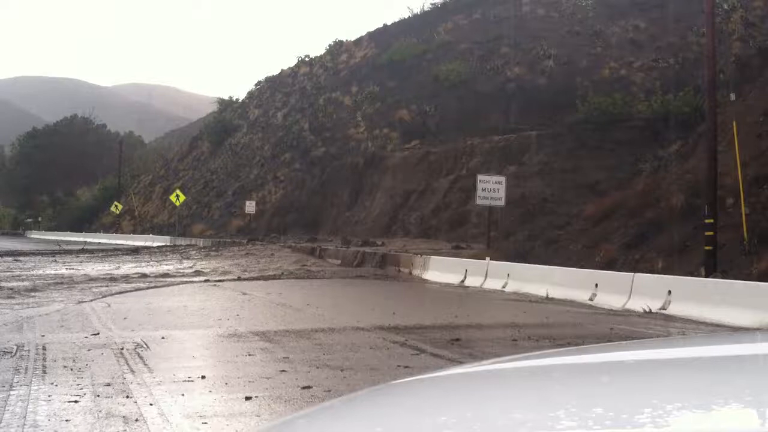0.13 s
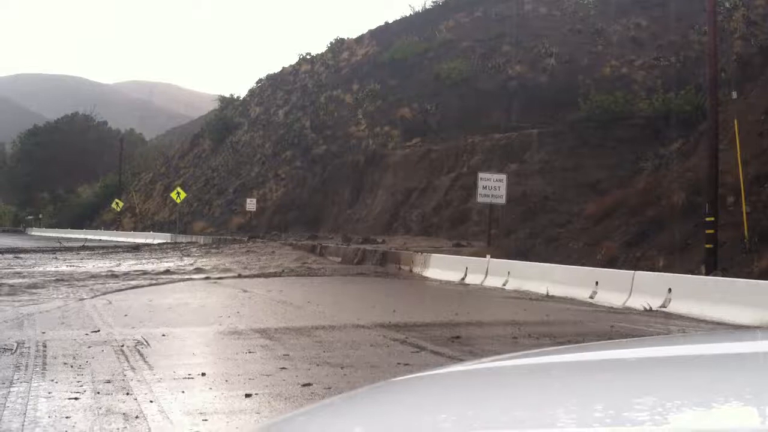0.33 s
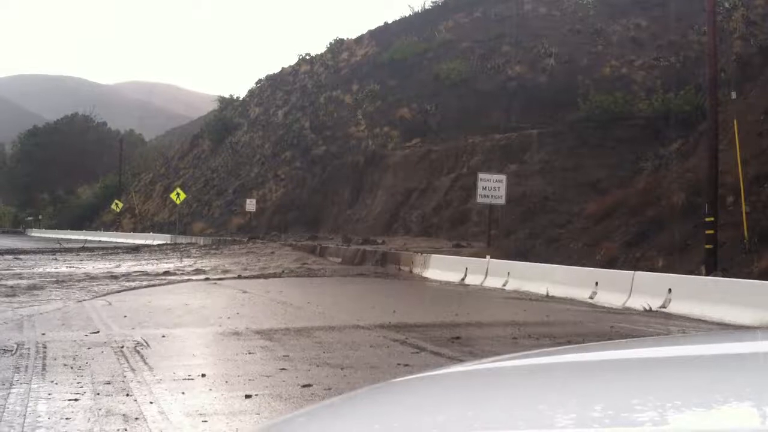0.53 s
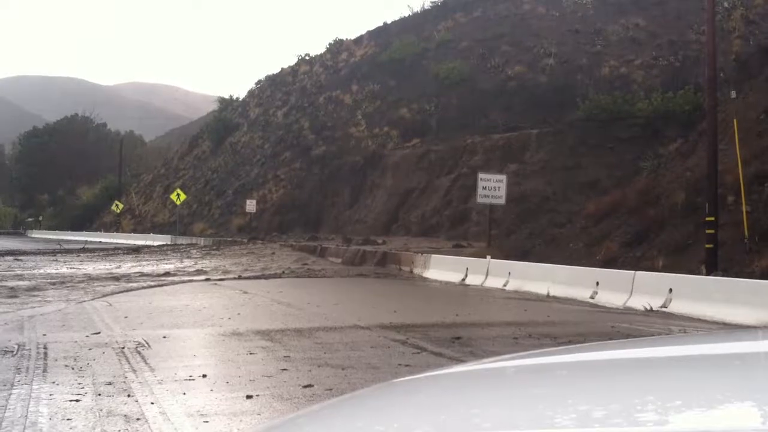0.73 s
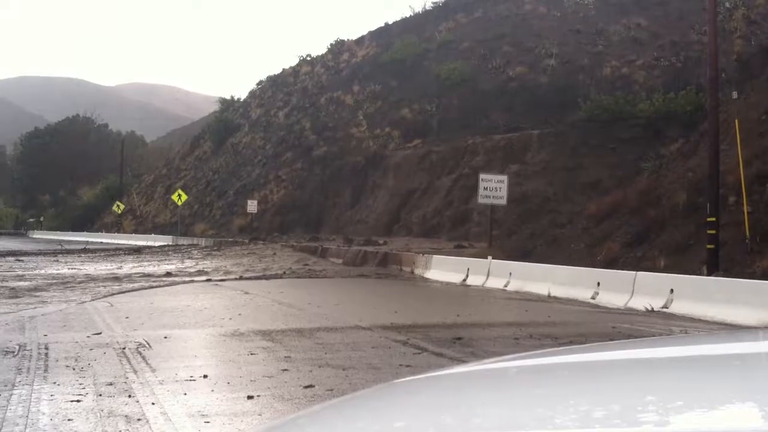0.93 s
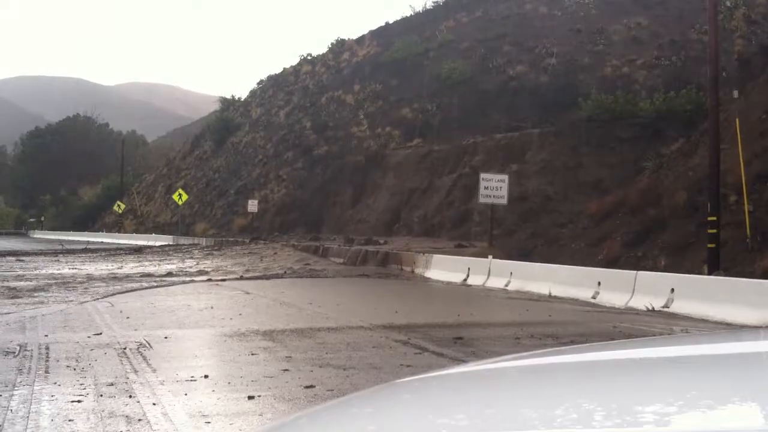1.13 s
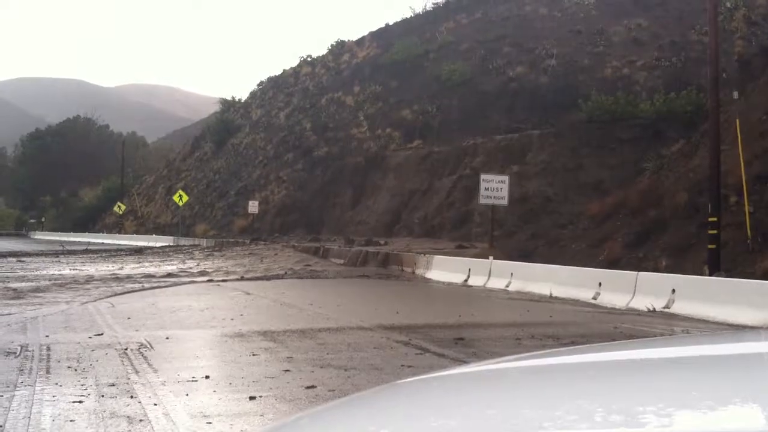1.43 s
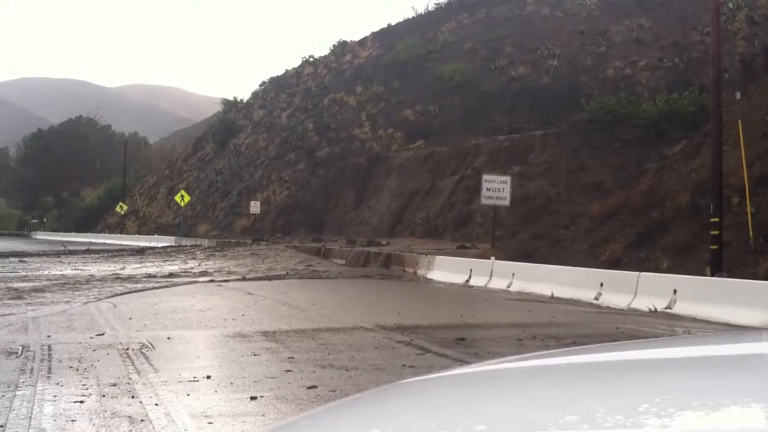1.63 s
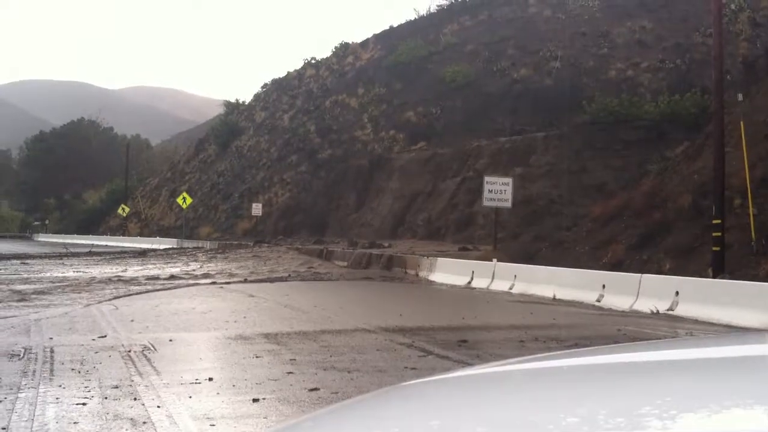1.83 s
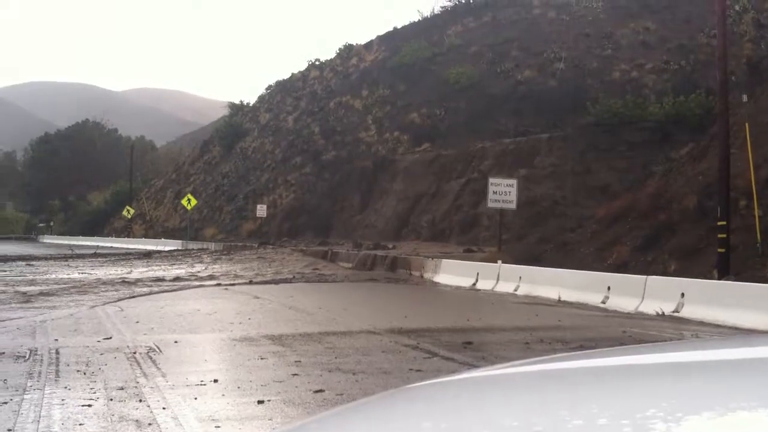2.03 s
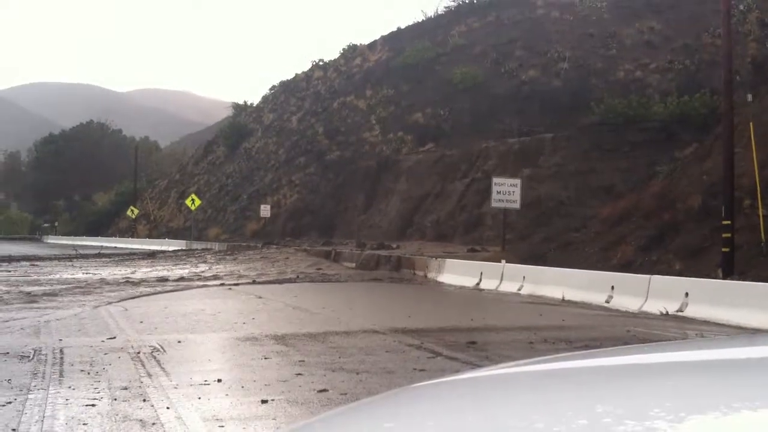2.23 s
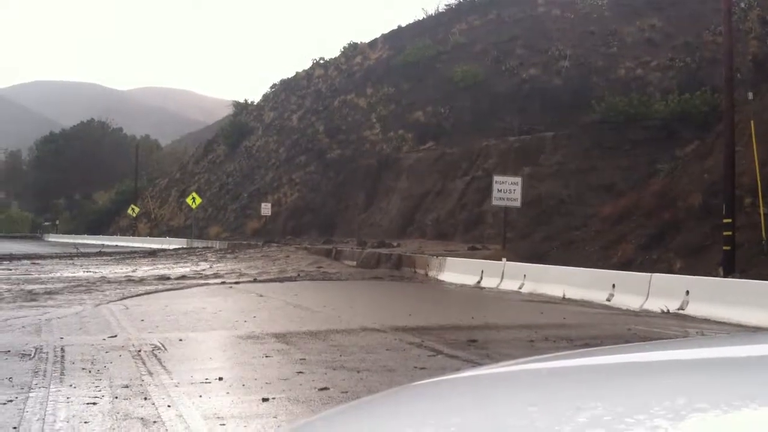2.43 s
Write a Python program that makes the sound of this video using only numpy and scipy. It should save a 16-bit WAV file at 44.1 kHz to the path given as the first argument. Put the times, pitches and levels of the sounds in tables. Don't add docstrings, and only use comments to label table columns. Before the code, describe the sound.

Muddy water rushes steadily across a road, heard from a standing car. The sound starts abruptly, a smooth bubbly hiss over a low roar, with hollow booming tones, sparse light ticks and slight wind late.

```python
import sys
import numpy as np
from scipy import signal
from scipy.fft import rfft, irfft
from scipy.io import wavfile

SR = 44100
rng = np.random.default_rng(int(sys.argv[2]) if len(sys.argv) > 2 else 0)


def amplitude_ratio(level_db):
    exponent = np.asarray(level_db, float) / 20
    return 10 ** exponent


def wrap_up_sound(samples):
    columns = np.atleast_2d(samples).T
    tamed = np.clip(columns, -1, 1)
    steps = np.round(tamed * 32767).astype(np.int16)
    wavfile.write(sys.argv[1], SR, steps)


N = 113337


def rms_one(x):
    return x / np.sqrt(np.mean(x ** 2) + 1e-20)


def follow(points):
    seconds, db = np.transpose(points)
    return amplitude_ratio(np.interp(np.arange(N) / SR, seconds, db))


def drift(rate):
    step = 40
    r = np.exp(-2 * np.pi * rate * step / SR)
    noise = rng.standard_normal(N // step + 2002)
    slow = signal.lfilter([1], [1, -2 * r, r * r], noise)[2000:]
    return np.interp(np.arange(N) / step, np.arange(len(slow)), rms_one(slow - slow.mean()))


def resonate(x, hz, width_hz):
    r = np.exp(-np.pi * width_hz / SR)
    zeros = np.array([1, 0, -1]) * (1 - r * r) / 2
    poles = [1, -2 * r * np.cos(2 * np.pi * hz / SR), r * r]
    return signal.lfilter(zeros, poles, x + 1e-18)


def coloured(x, points, patchy_db):
    hz = np.arange(N // 2 + 1) * SR / N + 1
    at, db = np.transpose(points)
    skirt = 40 * (np.minimum(np.log2(hz / at[0]), 0) - np.maximum(np.log2(hz / at[-1]), 0))
    whole = rfft(x) * amplitude_ratio(np.interp(np.log(hz), np.log(at), db) + skirt)
    bands = np.arange(int(3 * np.log2(at[0])), int(3 * np.log2(at[-1])) + 2)
    place = np.clip(3 * np.log2(hz), bands[0], bands[-1])
    out, together = np.zeros(N), drift(2.9)
    for k in bands:
        band = irfft(whole * np.maximum(1 - np.abs(place - k), 0), N)
        out += band * amplitude_ratio(patchy_db * (0.59 * together + drift(12.0)))
    return rms_one(out)


def bubbles():
    bubbles_per_s, spread_db, ring_cycles, share = 8200, 1.5, 3.7, 0.26
    sizes = amplitude_ratio(spread_db * np.minimum(rng.exponential(1, N), 5)) * rng.choice([-1, 1], N)
    bursts = sizes * (rng.random(N) < bubbles_per_s / SR)
    pitches = np.geomspace(400, 12000, 24)
    dealt = rng.integers(0, len(pitches), N)
    fizz = np.zeros(N)
    for k, hz in enumerate(pitches):
        fizz += resonate(bursts * (dealt == k), hz, 2.3 * hz / ring_cycles)
    return share * rms_one(fizz) + np.sqrt(1 - share ** 2) * rng.standard_normal(N)


# time in seconds, level in dB.
FLOW = [(0.1, -32), (0.7, -32), (1.3, -32), (1.9, -32), (2.57, -32)]
# frequency in Hz, density in dB per Hz.
RUSH = [(450, -6), (800, -5), (1300, -6.5), (2000, -5), (2600, 0), (3500, -8), (5200, -15.5), (6200, -29.5)]
# frequency in Hz, density in dB per Hz.
SPRAY = [(5000, -1.5), (6500, -5), (8600, -1.5), (10000, -9), (11500, -20), (12300, -31), (14600, -30)]


def rush():
    spray_db, spray_swell_db = -18.5, 0.5
    foam = bubbles()
    spray_gain = amplitude_ratio(spray_db + spray_swell_db * np.linspace(-0.5, 0.5, N))
    spray = spray_gain * coloured(foam, SPRAY, patchy_db=0.5)
    return follow(FLOW) * (coloured(foam, RUSH, patchy_db=0.08) + spray)


def off_the_car(x):
    delay_s, share, cut_hz = 0.001292, 0.22, 4200
    dull = signal.sosfilt(signal.butter(1, cut_hz, fs=SR, output="sos"), x)
    bounce = np.interp(np.arange(N) - delay_s * SR, np.arange(N), dull)
    return (x + share * bounce) / np.sqrt(1 + share ** 2)


# frequency in Hz, density in dB per Hz.
ROAR = [(70, -23.5), (100, -23), (130, -10), (170, -3.5), (240, -4.5), (310, -3.5), (400, -10),
        (500, -16.5)]


def mud_roar():
    level_db, swell_db, dip_share, dip_width_hz = -39.5, 3, 0.56, 30
    gain = amplitude_ratio(level_db + swell_db * np.linspace(-0.5, 0.5, N))
    roar = gain * coloured(rng.standard_normal(N), ROAR, patchy_db=0.44)
    near_tones = sum(resonate(roar, hz, dip_width_hz) for hz, _, _ in DRONE)
    return roar - dip_share * near_tones


# frequency in Hz, width in Hz, level in dB.
DRONE = [
    (180, 13, -52.5),
    (284.5, 15.5, -51.5),
    (314.8, 9.2, -51),
]
# centre in seconds, frequency in Hz, length in seconds,
# peak in dB.
BOOMS = [(0.252, 322, 0.23, -45.5), (0.306, 180, 0.11, -50.5), (0.542, 182.2, 0.12, -37.5),
         (0.6, 320.6, 0.2, -41.5), (0.72, 174, 0.16, -45.5), (0.825, 317.4, 0.096, -40),
         (0.835, 287, 0.14, -39.5), (0.835, 176.6, 0.26, -46), (1.087, 180, 0.19, -36.5),
         (1.222, 328, 0.12, -39.5), (1.302, 180.3, 0.15, -40), (1.49, 179.3, 0.12, -42),
         (1.545, 319, 0.11, -44), (1.69, 180, 0.23, -42), (2.04, 170.7, 0.13, -41.5),
         (2.408, 307, 0.19, -41)]


def drone():
    out, t = np.zeros(N), np.arange(N) / SR
    for hz, width_hz, db in DRONE:
        noise = rng.standard_normal(N + SR)
        tone = resonate(resonate(noise, hz, width_hz), hz, width_hz)
        out += amplitude_ratio(db) * rms_one(tone[SR:])
    for centre_s, hz, length_s, db in BOOMS:
        swell = np.cos(np.pi * np.clip((t - centre_s) / length_s, -0.5, 0.5)) ** 2
        out += amplitude_ratio(db) * swell * np.sin(2 * np.pi * (hz * t + rng.random()))
    return out


# time in seconds, level change in dB.
SURGE = [
    (0.1, -0.5),
    (0.4, 0),
    (0.58, 0),
    (0.85, 0.5),
    (1.1, -2),
    (1.4, 0),
    (1.7, 1.5),
    (2.1, -1),
    (2.57, -1),
]


def low_end():
    return follow(SURGE) * (mud_roar() + drone())


def ticks(rows, low_hz, high_hz, t60_s):
    out, t = np.zeros(N + SR), np.arange(SR // 50) / SR
    band = signal.butter(4, [low_hz, high_hz], "band", fs=SR, output="sos")
    for s, db in rows:
        tick = signal.sosfilt(band, rng.standard_normal(len(t)) * amplitude_ratio(-60 * t / t60_s))
        start = int(s * SR)
        out[start:start + len(t)] += amplitude_ratio(db) * tick / np.abs(tick).max()
    return out[:N]


# start in seconds, peak in dB.
DROPS = [
    (0.3277, -26),
    (0.4174, -50),
    (0.6232, -40),
    (0.6926, -42),
    (0.9084, -45),
    (1.726, -34),
    (1.9273, -38),
    (2.0674, -37),
]


def drops():
    return amplitude_ratio(-8) * ticks(DROPS, low_hz=6300, high_hz=9800, t60_s=0.005)


# start in seconds, peak in dB.
SPECKS = [
    (0.33, -67),
    (0.43, -66),
    (0.6, -65),
    (1.02, -58),
    (1.14, -66),
    (1.69, -65),
    (1.94, -62),
    (2.11, -65),
    (2.36, -64),
]


def specks():
    return ticks(SPECKS, low_hz=12500, high_hz=14700, t60_s=0.04)


# time in seconds, level in dB.
BREEZE = [
    (0.1, -73),
    (0.5, -68),
    (0.9, -59),
    (1.1, -61),
    (1.3, -58),
    (1.5, -56),
    (1.8, -67),
    (2.05, -54),
    (2.2, -54),
    (2.57, -52.5),
]
# frequency in Hz, density in dB per Hz.
BREEZE_COLOUR = [(22, -18), (45, -18), (70, -15), (105, -0.5), (130, 4)]


def breeze():
    return follow(BREEZE) * coloured(rng.standard_normal(N), BREEZE_COLOUR, patchy_db=-4)


def scene():
    water = off_the_car(rush()) + low_end()
    return (water + drops() + specks() + breeze())[None]


def recorder_hum(gate):
    level_db, top_hz = -81, 60
    low_pass = signal.butter(2, top_hz, fs=SR, output="sos")
    return amplitude_ratio(level_db) * rms_one(signal.sosfilt(low_pass, rng.standard_normal(N) * gate))


def top_cut(x):
    return signal.sosfilt(signal.butter(12, 14730, fs=SR, output="sos"), x)


# frequency in Hz, width in Hz, lift as a
PEAKS_AND_DIPS = [(490, 51, -0.37), (830, 120, -0.05), (2690, 160, -0.24), (3400, 200, -0.15), (353, 25, -0.17),
                  (706, 140, 0.095), (2997, 410, 0.55), (4500, 300, -0.34), (4820, 260, 0.51), (5690, 240, 0.48),
                  (6010, 420, -0.31)]


def record(dry):
    open_s, open_rise_s, low_cut_hz = 0.1203, 0.001, 100
    gate = np.clip((np.arange(N) / SR - open_s) / open_rise_s, 0, 1)
    heard = dry + sum(lift * resonate(dry, hz, width_hz) for hz, width_hz, lift in PEAKS_AND_DIPS)
    bass_cut = signal.butter(2, low_cut_hz, "high", fs=SR, output="sos")
    mix = signal.sosfilt(bass_cut, heard * gate) + recorder_hum(gate)
    return top_cut(mix)


dry = scene()
out = record(dry)
wrap_up_sound(out)
```